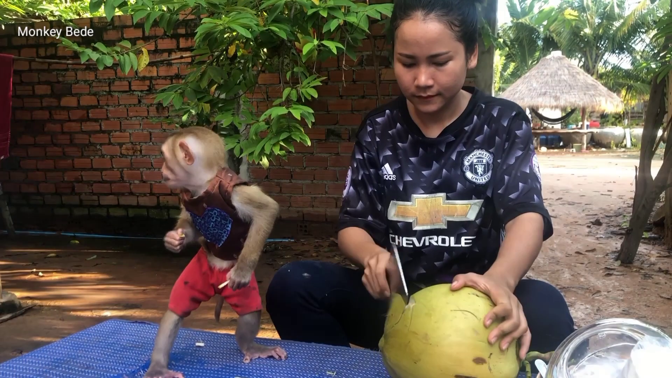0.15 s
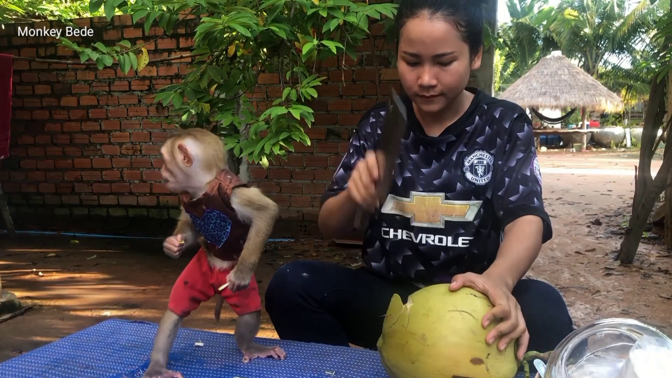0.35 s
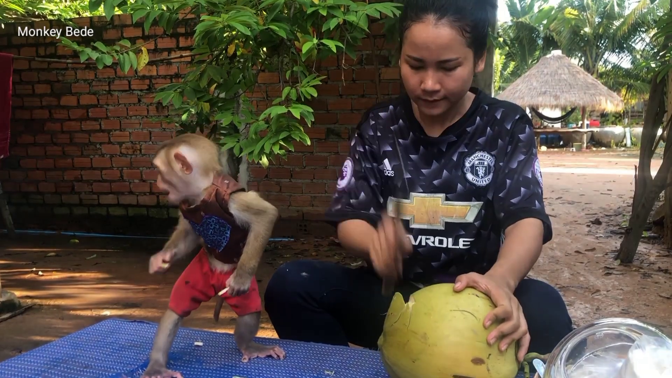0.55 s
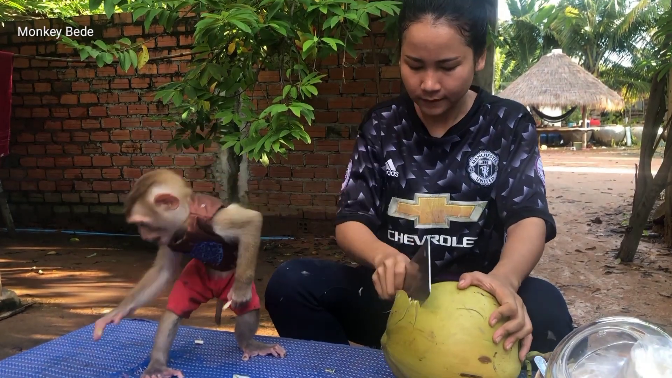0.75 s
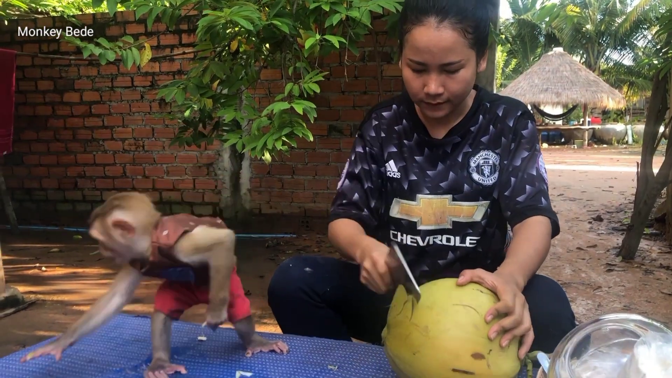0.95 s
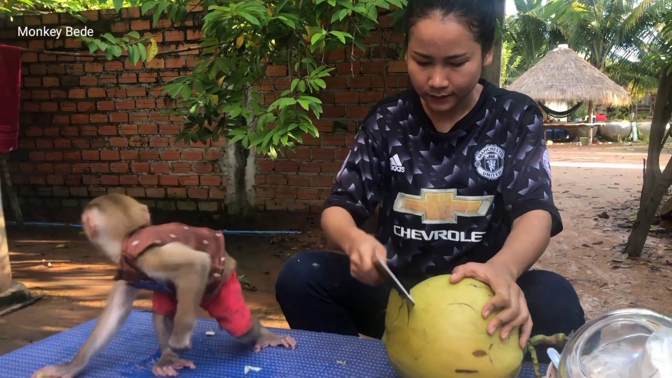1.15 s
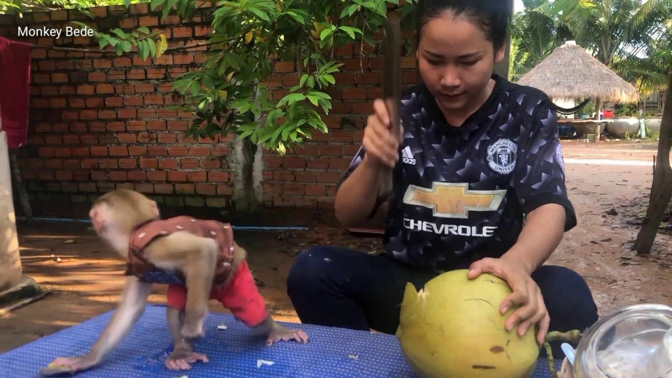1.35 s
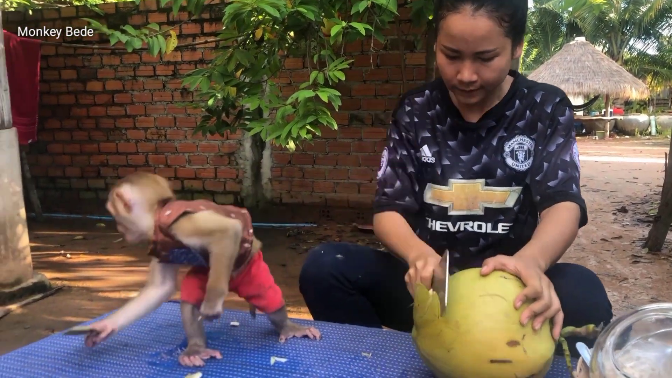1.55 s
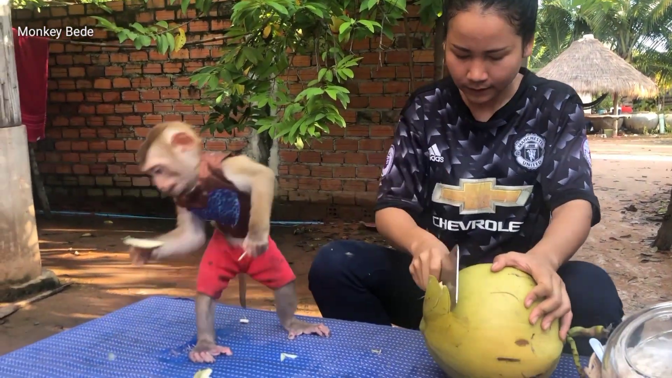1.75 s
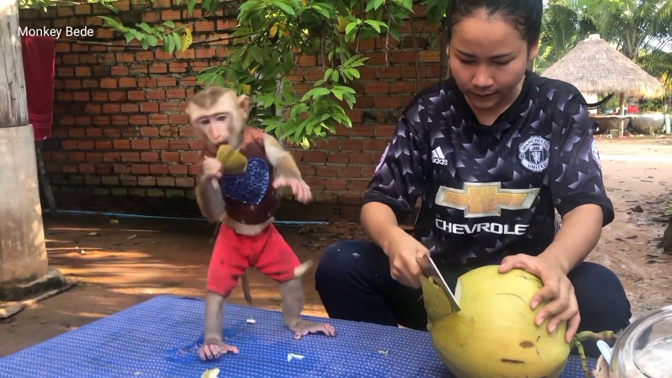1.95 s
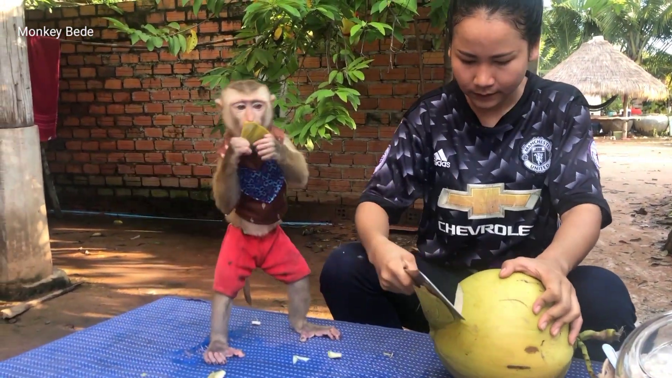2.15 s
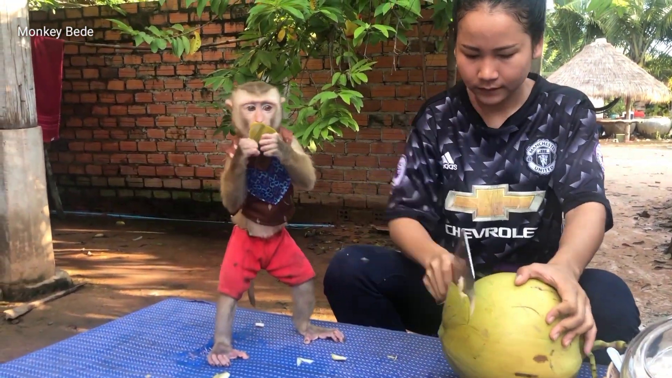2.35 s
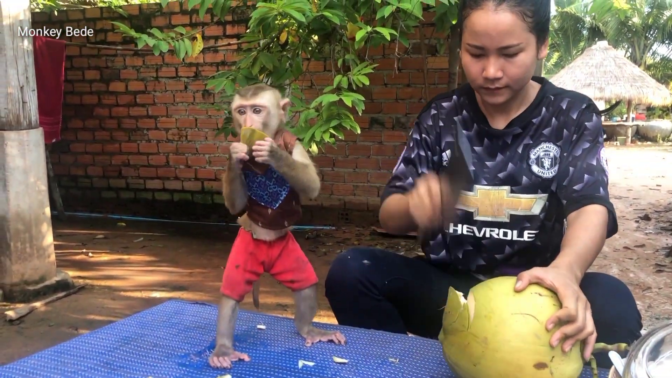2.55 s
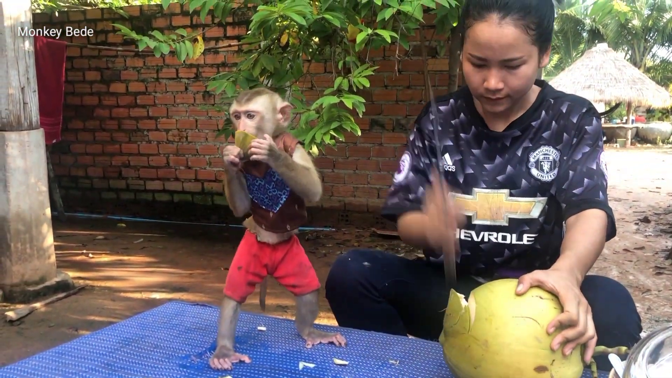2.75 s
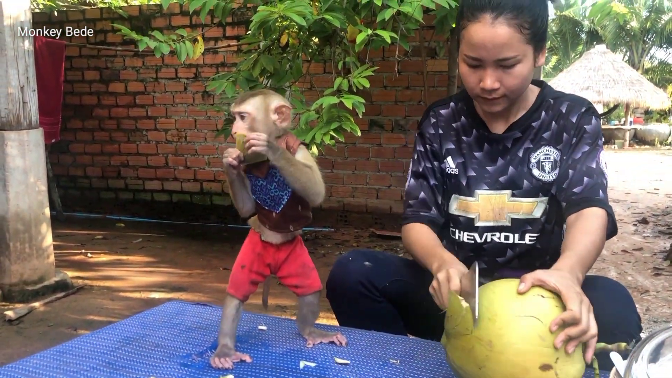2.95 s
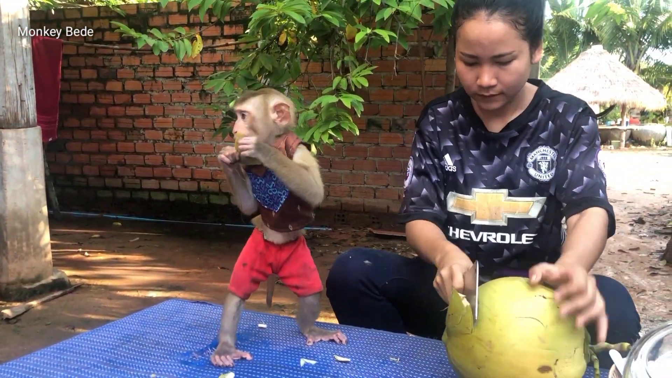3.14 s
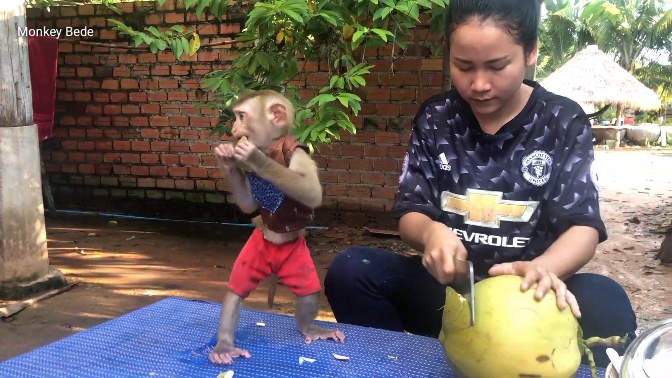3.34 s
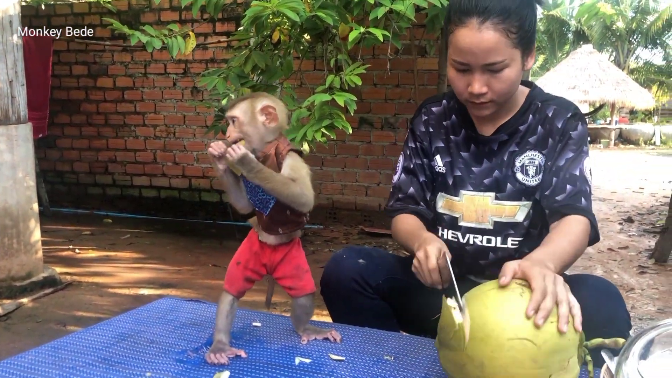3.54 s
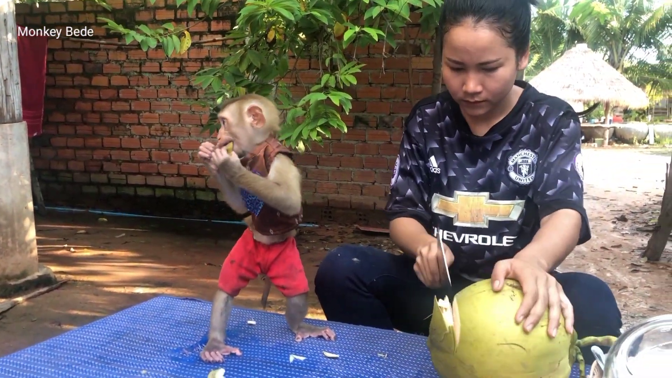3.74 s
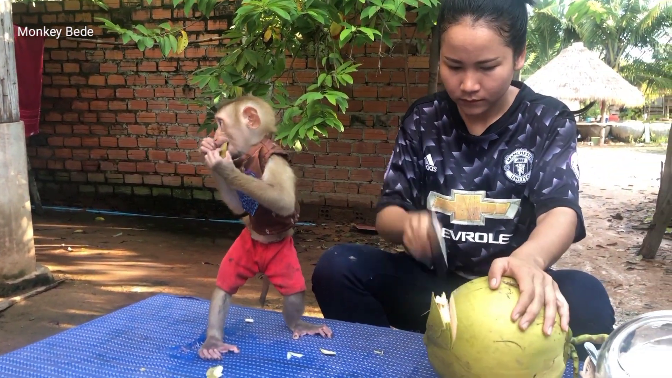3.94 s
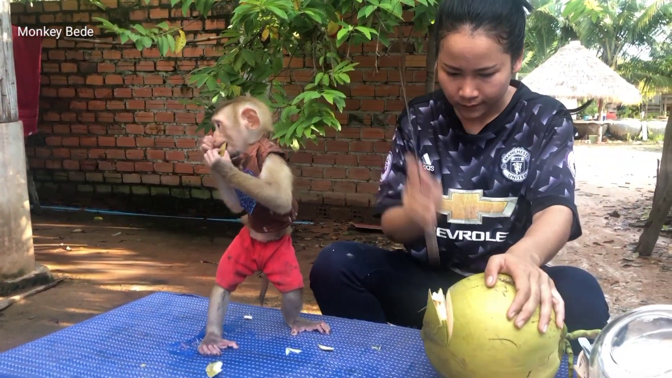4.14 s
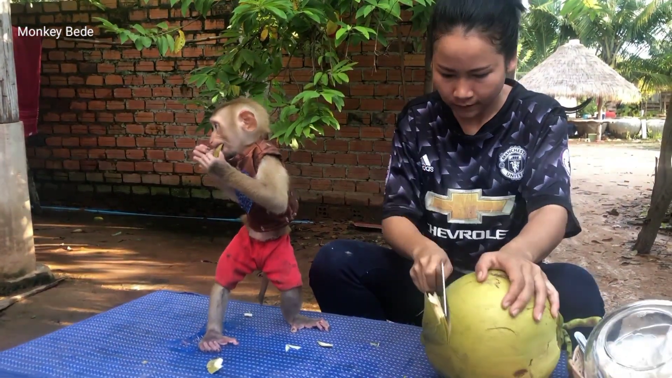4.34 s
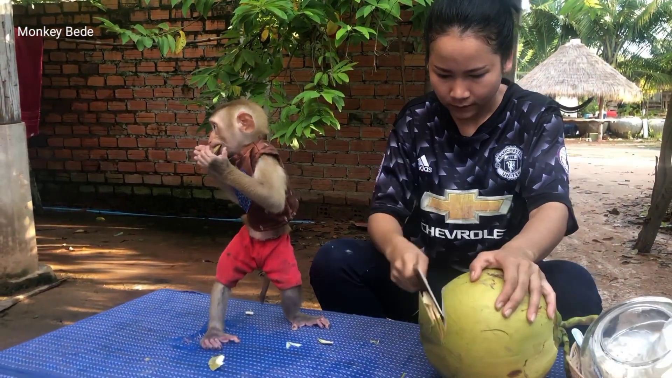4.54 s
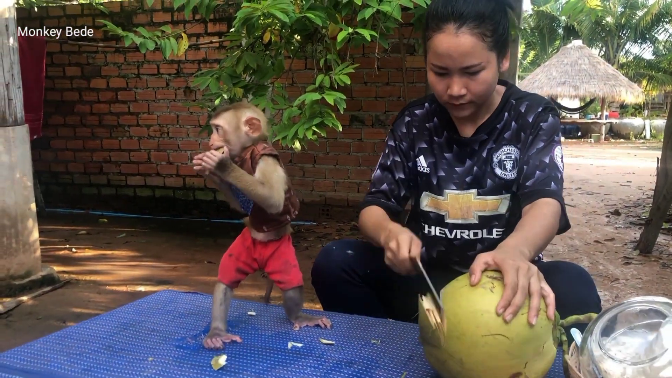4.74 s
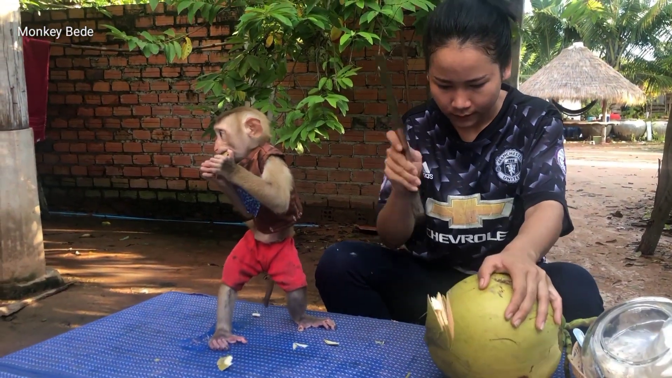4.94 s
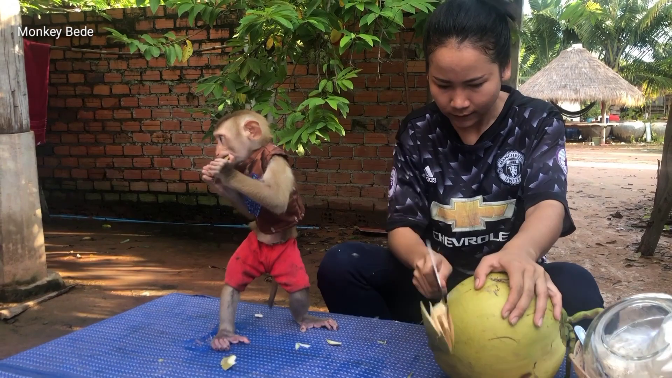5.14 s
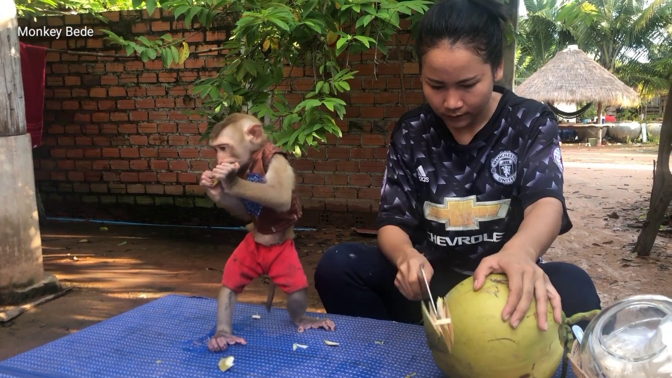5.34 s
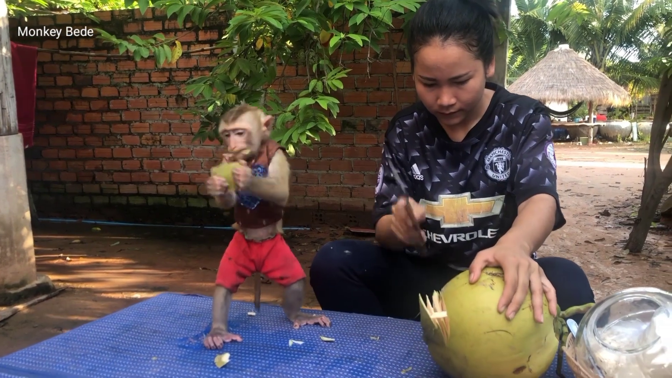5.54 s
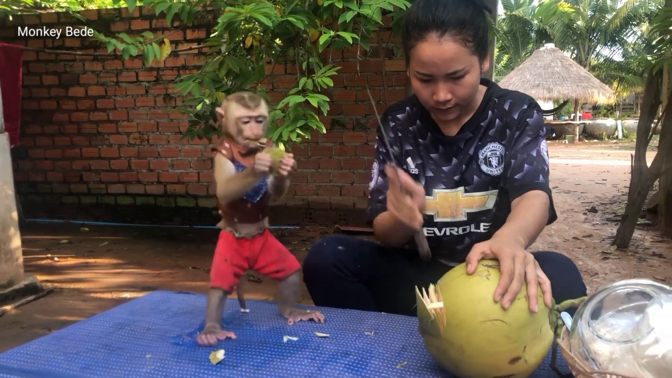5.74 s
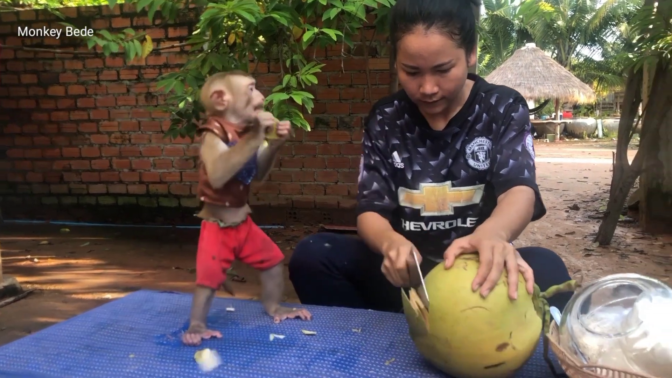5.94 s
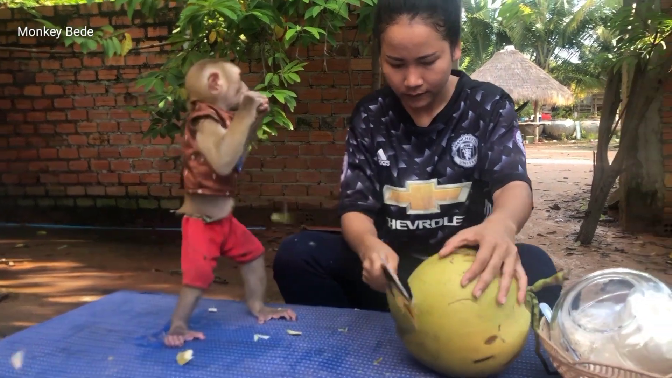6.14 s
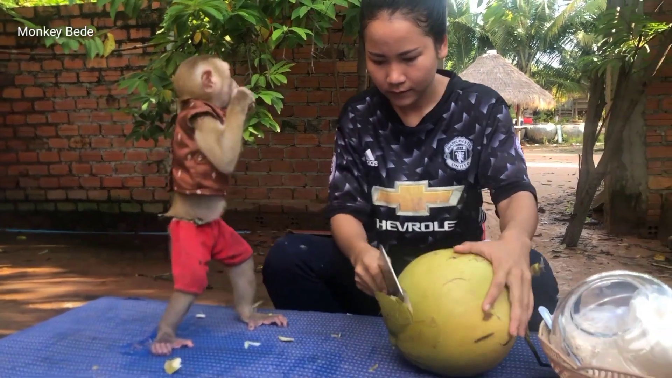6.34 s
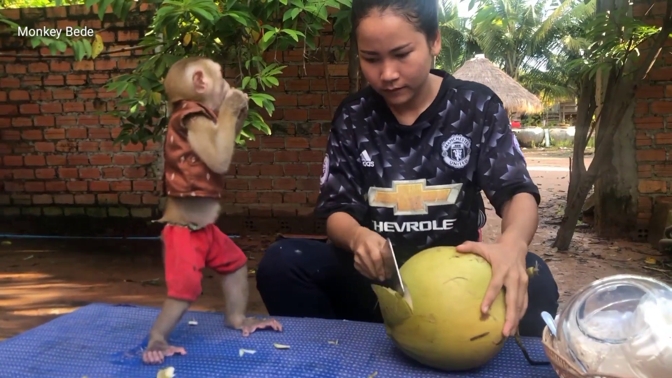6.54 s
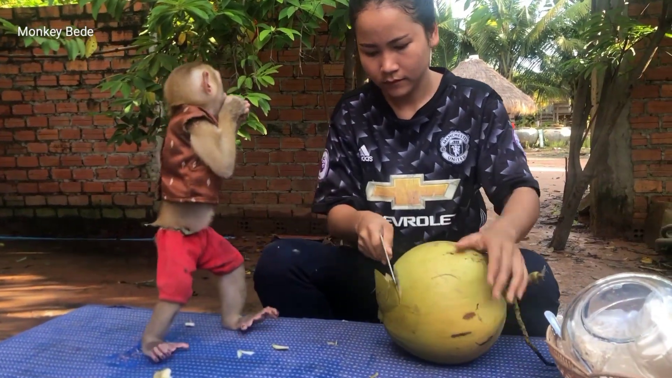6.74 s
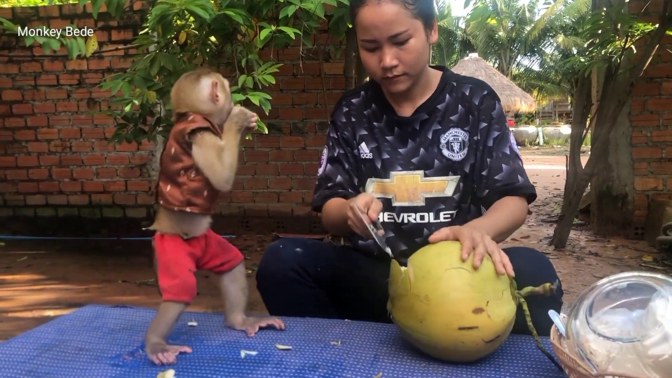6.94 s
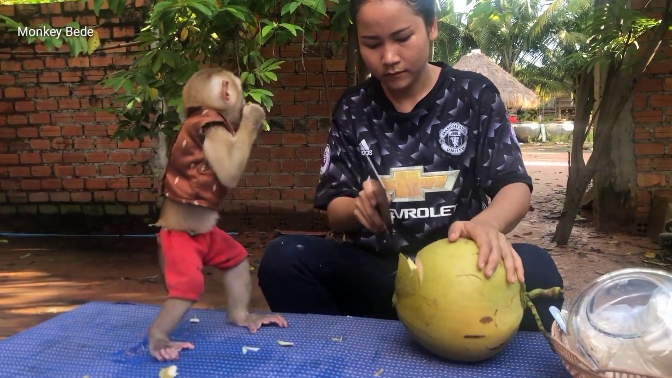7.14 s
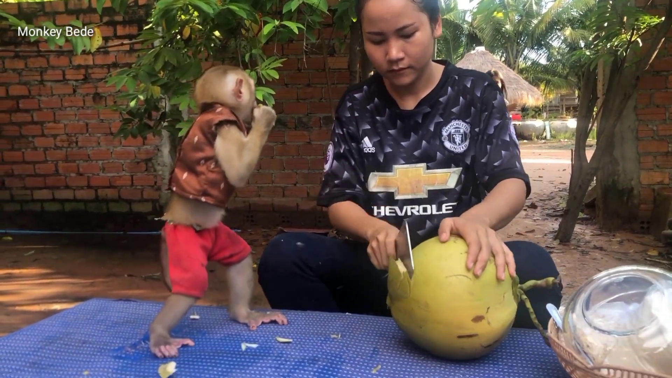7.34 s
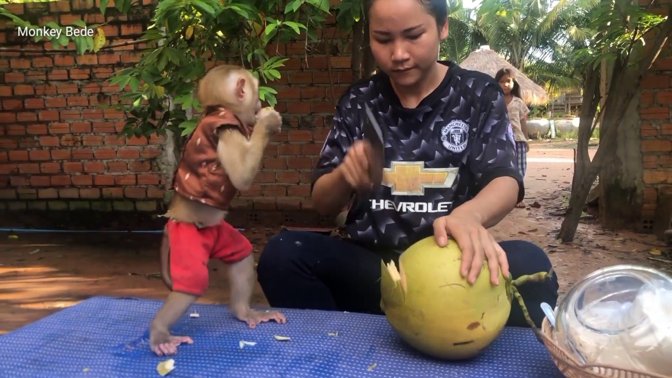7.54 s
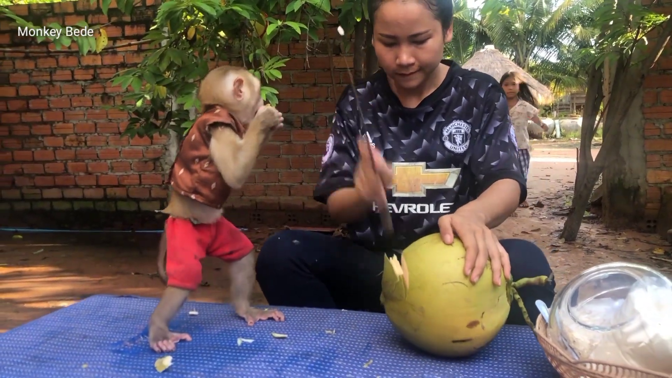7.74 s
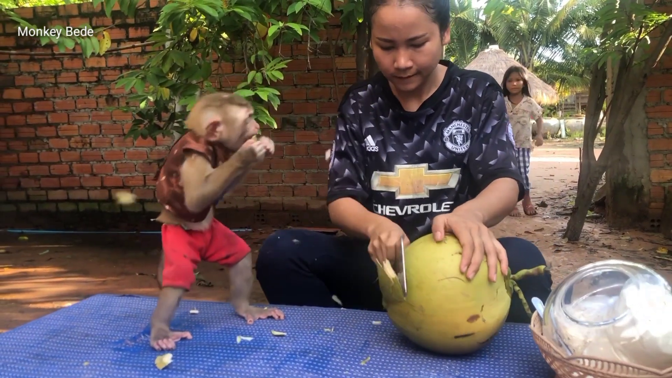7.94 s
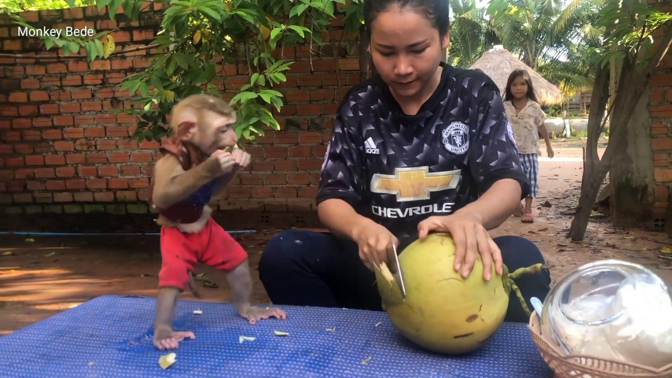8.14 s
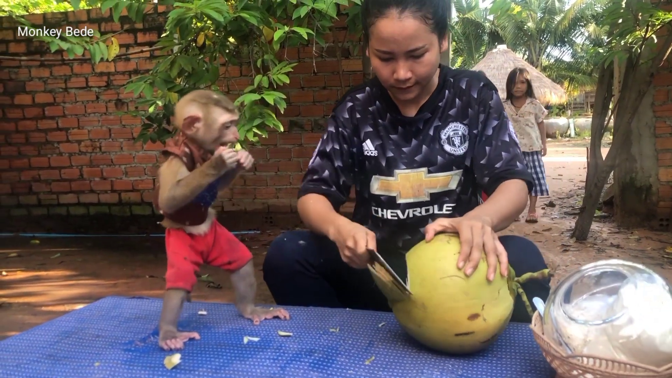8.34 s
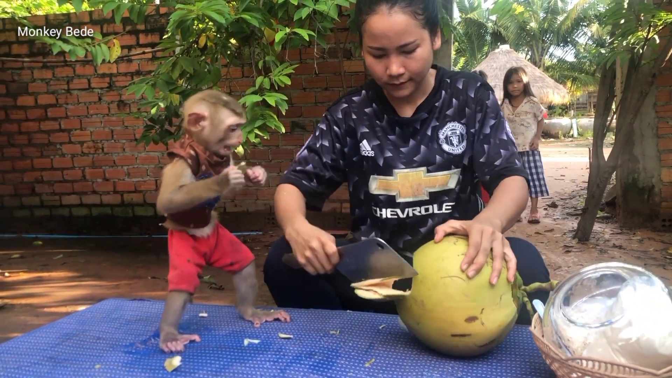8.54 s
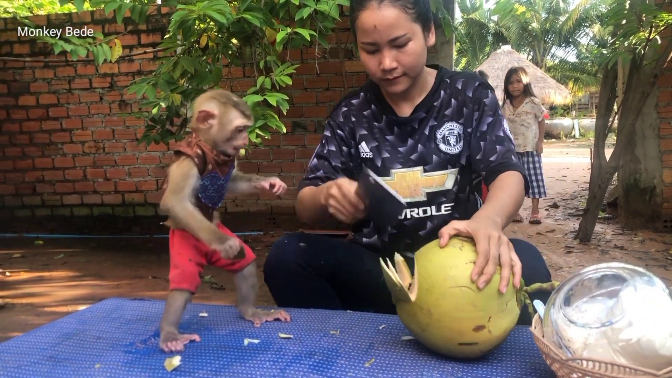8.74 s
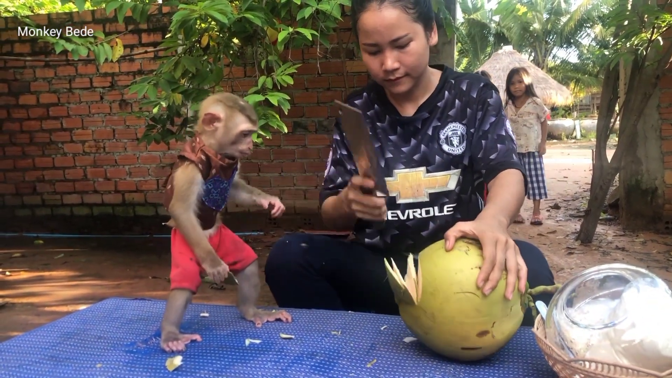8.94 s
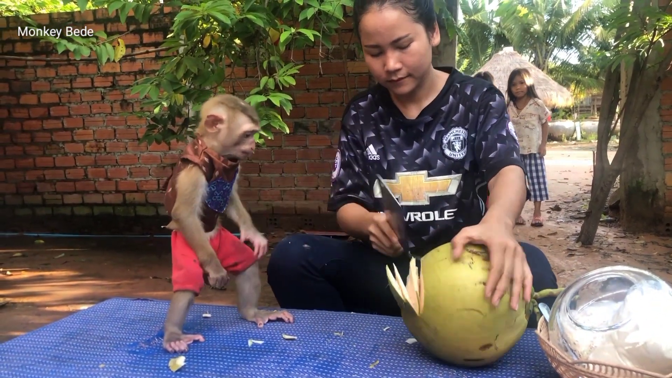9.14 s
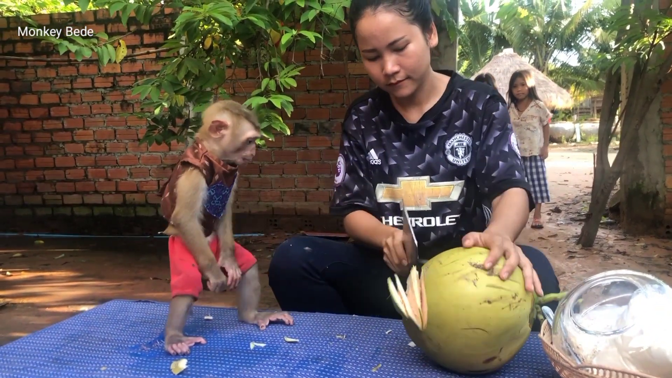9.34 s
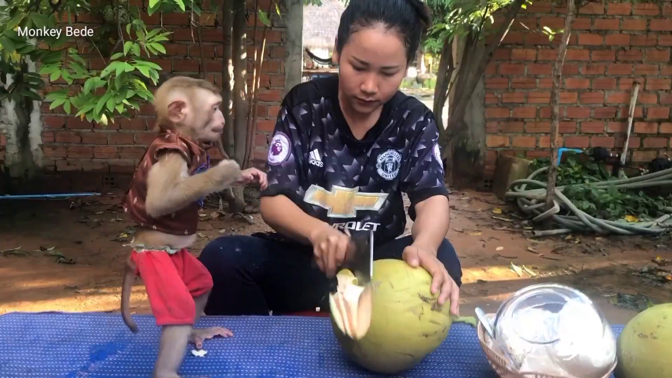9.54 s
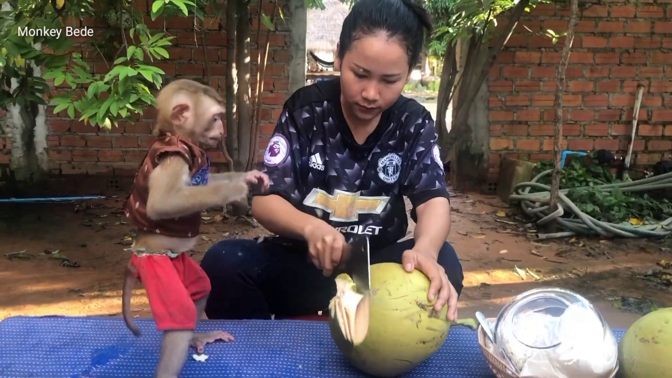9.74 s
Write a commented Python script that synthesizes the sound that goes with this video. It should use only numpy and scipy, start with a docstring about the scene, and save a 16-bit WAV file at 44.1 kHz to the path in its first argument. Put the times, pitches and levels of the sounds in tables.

```python
"""In a brick-walled yard, a cleaver chops into a green coconut on a mat. Shaped noise makes the husk crackle,
damped modes sound the shell and a falling sine makes the thump; the nut then lands in shrinking hops.
After most blows a steel dish chinks. Between blows the blade taps, pries, scrapes and squeaks: knocks,
ragged noise and gliding overtones. Far-off birds are swept sines; rumble and patchy hiss are uneven noise.
The sound drops out briefly just before the last chop."""
import sys
import numpy as np
from scipy import signal
from scipy.fft import rfft, irfft, next_fast_len
from scipy.io import wavfile
from scipy.ndimage import uniform_filter1d, map_coordinates

SR = 44100
rng = np.random.default_rng(int(sys.argv[2]) if len(sys.argv) > 2 else 0)


def file_out(sig):
    """Save sig as 16-bit WAV at sys.argv[1]."""
    # one column per channel
    cols = np.atleast_2d(sig).T
    # limit, then scale
    lim = np.clip(cols, -1, 1)
    pcm = np.round(lim * 32767).astype(np.int16)
    wavfile.write(sys.argv[1], SR, pcm)


N = 435699  # samples

# Blade into husk: start_s, cutting_s, crackle_db, tilt_db_per_octave, husk_thock_db, shell_knock_db,
# thump_db, final_thump_hz, first_hop_s, landing_db
CHOPS = [(.690, .009, -16, -1.3, -12.5, -16, -13, 159, 0.083, -18.5),
         (1.653, .009, -16, 0, -19.5, -24, -12.5, 163, 0.092, -16.5),
         (2.9036, .012, -17.5, -0.7, -15, -23, -15.5, 186, 0.083, -20),
         (4.288, 0.0053, -11.5, 1, -29, -5.5, -24.5, 194, 0.078, -31.5),
         (5.164, 0.0056, -14.5, -0.5, -26, -8.5, -19, 172, 0.084, -23),
         (5.893, .012, -25, 0.4, -31, -21.5, -17.5, 210, .085, -23.5),
         (7.903, 0.015, -22.5, -2, -17, -45, -13, 164.5, 0.083, -21),
         (9.617, 0.0091, -31, -.5, -51.5, -45, -19, 230, .089, -17.5)]
# Modes of the nut's hollow shell: nominal_hz, mean_level_db, t60_s
SHELL_MODES = [(484, -5.5, 0.038), (781, 3, 0.024), (1070, -3.5, .03), (1450, -11.5, 0.032),
               (1706, -13, 0.038), (2242, -19, 0.039), (2640, -17, 0.031), (3970, -17.5, 0.014)]
# Relative spectrum of tearing husk: frequency_hz, level_db_per_hz
HUSK_SPECTRUM = [(60, -35), (200, -1), (500, 3.5), (650, -3), (1100, 1), (1900, 0), (3300, -2), (5000, -6),
                 (8500, -9.5), (10200, -9.5), (12000, -9.5), (14000, -5), (15500, -9)]
# Relative spectrum of sliding hiss: frequency_hz, level_db_per_hz
HISS_SPECTRUM = [(300, -33), (1500, 4.5), (4000, 8.5), (7000, 3), (11000, 0), (14500, 9.5), (16000, 2)]
# Relative spectrum of the nut's body when rubbed or tapped: frequency_hz, level_db_per_hz
RUB_SPECTRUM = [(60, -12.5), (180, 2), (450, 4), (800, -2.5), (1400, -2.5), (2200, -15), (3500, -24),
                (8000, -41)]


def amp(db):
    """Logarithmic level: decibels become amplitude gain."""
    return 10 ** (np.asarray(db) / 20)


def unit(x):
    """Power normalization: scale to rms 1."""
    return x / np.sqrt(np.mean(x ** 2) + 1e-20)


def along(points, hz):
    """Logarithmic frequency scale: interpolate (Hz, value) points along it."""
    point_hz, value = np.transpose(points)
    return np.interp(np.log(hz + 1), np.log(point_hz), value)


def clock(seconds):
    """Uniform sampling: sample times from zero."""
    return np.arange(int(seconds * SR)) / SR


def add(track, start_s, x):
    """Superposition: mix x into the track from its start time."""
    i = max(round(start_s * SR), 0)
    track[i:i + len(x)] += x[:max(len(track) - i, 0)]


def wobble(t, rate):
    """Band-limited fluctuation: a smooth random curve with rate knots a second."""
    knots = rng.standard_normal(int(t[-1] * rate) + 4)
    return map_coordinates(knots, [t * rate])


def filtered(x, response):
    """Linear filtering: multiply the spectrum by a response of frequency."""
    size = next_fast_len(len(x) + 4096)  # zero padding limits wrap-around
    hz = np.fft.rfftfreq(size, 1 / SR)
    return irfft(rfft(x, size) * response(hz), size)[:len(x)]


def grit(t, spectrum, ragged_db, rate):
    """Amplitude-modulated noise: random level swings bunch it, a spectrum colours it; rms 1."""
    clumps = rng.standard_normal(len(t)) * amp(ragged_db * wobble(t, rate))
    return unit(filtered(clumps, lambda hz: amp(along(spectrum, hz))))


def ring(modes, attack, scatter_db):
    """Modal superposition: damped sines, at slightly new strengths and pitches each time."""
    t = clock(.3)
    hz, db, t60 = np.transpose(modes)[:, :, None]
    level, detune = rng.standard_normal((2, len(modes), 1))
    decay = amp(db + scatter_db * level - 60 * t / t60)
    waves = decay * np.sin(2 * np.pi * hz * (1 + 0.0067 * detune) * t)
    return waves.sum(0) * (1 - np.exp(-t / attack))


def chops():
    """Fracture noise and impulse response: torn fibres crackle; the push excites husk and shell modes."""
    out, t = np.zeros(N), clock(.3)
    for start_s, cutting_s, crackle_db, tilt, thock_db, knock_db, *_ in CHOPS:
        travel = t / cutting_s
        # the skin parts at once, the tearing swells with depth and ends as the blade sticks
        cut = np.minimum(0.29 + travel / 0.71, 1) / np.sqrt(1 + (travel / 0.88) ** 14)
        # each chop's crackle has its own brightness
        colour = [(hz, db + tilt * np.log2(hz)) for hz, db in HUSK_SPECTRUM]
        blow = amp(crackle_db) * cut * grit(t, colour, ragged_db=0.4, rate=1800)
        thock = ring([(430, 0.0027, .032)], attack=0.0016, scatter_db=1.0)  # one husk mode
        knock = ring(SHELL_MODES, attack=0.0015, scatter_db=0.8)
        add(blow, .25 * cutting_s, amp(thock_db) * thock)
        add(blow, .25 * cutting_s, amp(knock_db) * knock)
        add(out, start_s, in_yard(blow, wet_db=-13))
    return out


def thuds(count=3):
    """Inelastic rebound: the driven nut lands in ever shorter, weaker hops; tipped by hand, it rocks."""
    # The nut rocks on the mat: thump_s, thump_db, final_pitch_hz
    rocks = [(.301, -32.5, 243), (.344, -35.5, 232), (2.171, -27, 158), (6.598, -34, 218),
             (6.824, -40, 212), (7.267, -44, 192)]
    # the mat's crunch: level over the thump, and time scale of its lead
    push_crunch_db, push_lead_s = -7.5, 0.0078
    land_crunch_db, land_lead_s = -7.5, 0.017
    rock_crunch_db, rock_lead_s = -12.5, 0.0092
    land_hz, settle_hz = 144.4, 167.4  # first landing, later bounces
    hop_shrink = .62  # each flight over the one before
    hop_loss_db = 15  # times the square root of the bounce number
    out = np.zeros(N)
    for start_s, cutting_s, *_, thump_db, hz, hop_s, landing_db in CHOPS:
        sinking_s = .030 + .55 * cutting_s  # from the blow until the nut bottoms out
        add(out, start_s, thud(thump_db, hz, push_crunch_db, push_lead_s, sinking_s))
        takeoff_s = start_s + sinking_s
        for k in range(count):
            flight_s = hop_s * hop_shrink ** k
            pitch = settle_hz if k else land_hz
            level_db = landing_db - hop_loss_db * np.sqrt(k)
            add(out, takeoff_s, thud(level_db, pitch, land_crunch_db, land_lead_s, flight_s))
            takeoff_s += flight_s
    tipping_s = .04
    for thump_s, thump_db, hz in rocks:
        add(out, thump_s - tipping_s, thud(thump_db, hz, rock_crunch_db, rock_lead_s, tipping_s))
    return out


def thud(thump_db, hz, crunch_db, lead_s, early_s):
    """Compression and release: the mat crunches, then the nut thumps early_s in, its pitch sinking."""
    # Relative spectrum of the crunching mat: frequency_hz, level_db_per_hz
    crunch_spectrum = [(40, -22), (150, 4.5), (480, -1.5), (650, -6), (950, -5.5), (2000, -14.5),
                       (3500, -20), (6000, -29), (10000, -35.5), (15000, -32.5)]
    # Modes of the mat and the ground under it: nominal_hz, mean_level_db, t60_s
    ground_modes = [(68.4, -13, 0.11), (150.8, -15.5, 0.11)]
    t = clock(.3)
    ahead = (early_s - t) / lead_s
    # a faint creak leads in, then the fibres give way all at once
    squeeze = 0.42 * np.exp(-np.abs(ahead) / 2) + 0.62 / np.sqrt(1 + (ahead / 0.95) ** 10)
    release = np.exp(-np.maximum(t - early_s, 0) / 0.0051)
    crunch = grit(t, crunch_spectrum, ragged_db=2.5, rate=500)
    blow = amp(crunch_db) * squeeze * release * crunch
    pitch = hz * (1 + 1.554 * np.exp(-t / 0.0033))  # sinks to hz as the load eases
    envelope = amp(-60 * t / 0.075) * (1 - np.exp(-t / 0.00077))
    nut = -np.sin(2 * np.pi * np.cumsum(pitch) / SR) * envelope
    add(blow, early_s, nut + ring(ground_modes, attack=0.0017, scatter_db=0.5))
    return in_yard(amp(thump_db) * blow, wet_db=-10.0)


def chinks():
    """Contact damping: the jolted dish drops back, its rim buzzing on the mat and soon falling silent."""
    # The dish lands: start_s, level_db (before a 3.5 dB cut)
    landings = [(.768, -35.5), (1.736, -34.5), (2.9944, -33.5), (5.251, -42.5), (7.987, -51), (9.741, -41)]
    # Modes of the dish: nominal_hz, mean_level_db, t60_s
    dish_modes = [(3340, -13, .1), (4120, -1, .09), (5500, -11, .05), (7620, -5, .06), (9080, -10, .07),
                  (9750, -6, .05), (10600, -10, .05), (13600, -9, .06), (14650, -3, .06)]
    out, t = np.zeros(N), clock(.3)
    for start_s, db in landings:
        rim = ring(dish_modes, attack=0.00046, scatter_db=5.5) * amp(3.6 * wobble(t, 440))
        buzz = amp(-2 - 60 * t / 0.12) * grit(t, HISS_SPECTRUM, ragged_db=2.0, rate=700)
        add(out, start_s, in_yard(amp(db - 3.5) * (rim + buzz), wet_db=-11.5))
    return out


def crumbs(count=7):
    """Random small impacts: chips jolted off the mat patter back 0.12 to 0.24 s after each chop starts."""
    out, t = np.zeros(N), clock(.03)
    for start_s, *_ in CHOPS:
        for when, size in rng.random((count, 2)):
            delay_s = .12 + .12 * when
            tick = amp(-60 * t / 0.013) * grit(t, HISS_SPECTRUM, ragged_db=1, rate=610)
            pat = amp(-60 * t / 0.058) * grit(t, RUB_SPECTRUM, ragged_db=6.0, rate=440)
            level_db = -33.0 - 31 * size - 10 * when  # a larger draw is quieter, and so is a later chip
            add(out, start_s + delay_s, amp(level_db) * (0.16 * tick + pat))
    return out


def taps():
    """Impact excitation: the blade set on the nut gives a click, a damped woody knock and a little steel."""
    # Light touches: start_s, click_db, shell_knock_db (before a 2.5 dB cut), steel_ring_db
    touches = [(.273, -33, -27, -57), (2.169, -51, -30.5, -70), (3.429, -45.5, -39.5, -73),
               (3.8911, -32.5, -36, -53), (3.902, -33, -33, -69), (4.058, -53, -39.5, -80),
               (4.652, -38, -38, -69), (6.263, -54, -37.5, -73), (6.324, -38.5, -23.5, -69),
               (6.359, -62, -31.5, -77), (6.453, -65, -38, -73), (7.367, -35.5, -43, -59),
               (9.363, -54, -37.5, -80.5), (9.418, -55, -25, -54)]
    # Modes of the blade: nominal_hz, mean_level_db, t60_s
    blade_modes = [(1744, -9, .2), (2713, -13, .2), (3946, -6, .1), (5308, -6, .2), (6756, -2, .18),
                   (8300, -9, .09), (9390, -13, .1), (13410, -13, .1)]
    out, t = np.zeros(N), clock(.3)
    for start_s, click_db, knock_db, steel_db in touches:
        click = amp(click_db - 60 * t / 0.026) * grit(t, HUSK_SPECTRUM, ragged_db=4.0, rate=1500)
        husk = amp(-3 - 60 * t / 0.05) * grit(t, RUB_SPECTRUM, ragged_db=0.5, rate=180)
        shell = ring(SHELL_MODES, attack=0.0018, scatter_db=1.0)
        knock = amp(knock_db - 2.5) * (shell + husk)
        steel = amp(steel_db) * ring(blade_modes, attack=0.0008, scatter_db=2.8)
        add(out, start_s, in_yard(click + knock + steel, wet_db=-12.0))
    return out


def prying():
    """Friction and fracture noise: steel or skin drags in ragged strokes; fibres snap singly or in bursts."""
    # Blade or palm slides on the husk: start_s, length_s, hiss_db, rubbing_body_db
    strokes = [(1.106, 0.062, -56.5, -75), (1.284, 0.028, -60.5, -57), (2.377, 0.044, -53.5, -56),
               (3.336, .33, -64.5, -60.5), (4.821, 0.052, -57.5, -55.5), (5.592, 0.029, -51.5, -57.5),
               (6.049, 0.45, -64.5, -57), (6.481, 0.32, -55, -55), (6.811, 0.065, -65, -50),
               (7.031, 0.21, -77, -57.5), (7.367, .05, -51, -50), (7.615, 0.042, -49.5, -61),
               (7.756, .14, -51, -73), (8.146, 0.093, -61.5, -74), (8.282, 0.17, -52, -58),
               (8.491, .27, -63, -58), (8.58, 0.071, -47, -53.5), (9.62, 0.064, -49, -61),
               (9.751, 0.2, -59.5, -54)]
    # Single fibres snap: start_s, level_db
    single_snaps = [(2.158, -34.5), (4.707, -39.5), (7.312, -41.5), (8.138, -39.5), (8.255, -48),
                    (8.312, -39), (8.509, -44)]
    # The blade levers a slice and fibres snap in quick bursts: start_s, length_s, mean_level_db
    levers = [(1.988, .11, -44.5), (2.135, .04, -38.5), (8.41, .18, -44.5)]
    fibres_per_s, fibre_spread_db = 64, 3
    out = np.zeros(N)
    for start_s, length_s, hiss_db, body_db in strokes:
        t = clock(length_s)
        # exponent 0 would start and stop abruptly, 1 gives a full arch
        speed = np.abs(np.sin(np.pi * t / length_s)) ** 0.56
        # quiet slides are more ragged: 2 dB at -53 dB of hiss, falling by e over 24 dB
        ragged_db = 2 * np.exp((-53 - hiss_db) / 24)
        hiss = amp(hiss_db) * grit(t, HISS_SPECTRUM, ragged_db, rate=450)
        body = amp(body_db) * grit(t, RUB_SPECTRUM, ragged_db=6.5, rate=77.7)
        add(out, start_s, in_yard(speed * (hiss + body), wet_db=-10.5))
    snaps, t = list(single_snaps), clock(.05)
    for start_s, length_s, db in levers:
        for slot_s in np.arange(start_s, start_s + length_s, 1 / fibres_per_s):
            snap_s = slot_s + rng.random() / fibres_per_s / 2
            snaps.append((snap_s, db + fibre_spread_db * rng.standard_normal()))
    for snap_s, db in snaps:
        snap = amp(db - 60 * t / 0.016) * grit(t, HISS_SPECTRUM, ragged_db=0.5, rate=1500)
        add(out, snap_s, in_yard(snap, wet_db=-9.5))
    return out


def squeaks(count=4):
    """Stick-slip oscillation: steel on wet fibre gives a short unsteady stack of overtones."""
    # The blade squeaks in the husk: start_s, length_s, start_slip_hz, end_slip_hz, level_db
    slips = [(1.03, 0.039, 1142, 1493, -56), (1.055, 0.03, 800, 960, -54.5),
             (8.32, .022, 2060, 1710, -51.5), (8.686, 0.03, 2410, 2710, -58)]
    out = np.zeros(N)
    k = np.arange(1, count + 1)[:, None]
    for start_s, length_s, start_hz, end_hz, db in slips:
        t = clock(length_s)
        glide = start_hz + (end_hz - start_hz) * t / length_s
        rate = glide * (1 + 0.032 * wobble(t, 510))
        # the husk passes mostly the overtones near its squeak resonance at 2900 Hz
        weight = 1 / (1 + np.log2(k * rate / 2900) ** 2)
        stack = (weight * np.sin(2 * np.pi * k * np.cumsum(rate) / SR)).sum(0)
        swell = np.sin(np.pi * t / length_s)
        add(out, start_s, in_yard(amp(db) * swell * unit(stack), wet_db=-7))
    return out


def birds_and_held_note():
    """Frequency modulation: arched hoots, quick gliding whistles and one faint held note."""
    # All levels here are before a 4.5 dB cut
    # A far bird's soft hoots: start_s, length_s, top_hz, level_db
    hoots = [(.10, .14, 1235, -56.5), (.24, 0.138, 1186, -54), (0.437, 0.147, 1090, -55.5),
             (2.455, 0.11, 1120, -51), (2.60, 0.085, 1070, -59), (2.715, 0.092, 1064, -54),
             (3.372, .11, 1118, -55), (3.622, .11, 1070, -53.5), (3.793, 0.12, 1080, -55),
             (4.048, 0.089, 1083, -60), (4.21, 0.09, 1235, -51.5), (5.663, 0.089, 1110, -58)]
    # One faint held note, perhaps the blade ringing: start_s, length_s, pitch_hz, level_db
    held_notes = [(6.83, .38, 1730, -63)]
    # Small birds' whistles: start_s, length_s, start_hz, end_hz, level_db
    whistles = [(0, 0.027, 3700, 2460, -54.5), (.367, 0.05, 3850, 3470, -59), (1.57, .06, 5950, 6500, -66),
                (2.397, .11, 4200, 2840, -56.5), (3.451, 0.062, 4820, 2650, -53),
                (5.113, 0.045, 7230, 3600, -57.5), (7.313, .055, 5310, 3700, -48),
                (9.088, 0.052, 6100, 6500, -68.5)]
    out = np.zeros(N)
    for start_s, length_s, top_hz, db in hoots:
        # pitch falls with the squared distance from the top, 0.61 of the way through
        arch = 1 - .32 * (clock(length_s) / length_s - 0.61) ** 2
        add(out, start_s, note(top_hz * arch, db, waver=0.0089, flutter_db=7.5, wet_db=-7.5))
    for start_s, length_s, hz, db in held_notes:
        level_pitch = hz * np.ones_like(clock(length_s))
        add(out, start_s, note(level_pitch, db, waver=.008, flutter_db=2.5, wet_db=0))
    for start_s, length_s, start_hz, end_hz, db in whistles:
        glide = start_hz * (end_hz / start_hz) ** (clock(length_s) / length_s)
        add(out, start_s, note(glide, db, waver=.028, flutter_db=6.5, wet_db=0))
    return out


def note(pitch, db, waver, flutter_db, wet_db):
    """Phase integration: one note follows a wavering pitch curve while its level flutters."""
    t, progress = np.arange(len(pitch)) / SR, np.linspace(0, 1, len(pitch))
    wavering = pitch * (1 + waver * wobble(t, pitch[0] / 10))
    flutter = flutter_db * wobble(t, pitch[0] / 30)
    swell = np.sqrt(np.abs(np.sin(np.pi * progress)))
    tone = np.sin(2 * np.pi * np.cumsum(wavering) / SR)
    return in_yard(amp(db - 4.5 + flutter) * swell * tone, wet_db)


def outdoors():
    """Broadband turbulence: a restless low rumble under a patchy hiss of distant leaves."""
    # Relative spectrum of the yard air: frequency_hz, level_db_per_hz
    air_spectrum = [(15, -40.5), (25, -20.5), (58, -5), (148, -1), (313, -10), (389, -12), (684, -15.5),
                    (741, -16.5), (1050, -17), (1410, -22), (2300, -26.5), (2490, -28), (3170, -23.5),
                    (6210, -34), (15500, -40.5)]
    # The breeze: time_s, rumble_db (before a 3 dB lift), distant_hiss_db (before a 1.2 dB cut)
    breeze = [(0, -57, -60), (2.0, -57, -59), (5.8, -58.5, -58), (6.5, -55, -58), (7.3, -52.5, -56),
              (8.2, -63, -61), (8.701, -56.5, -59.5), (9.1, -64.5, -64.5), (9.499, -61, -65)]
    t = np.arange(N) / SR
    time_s, rumble_db, hiss_db = np.transpose(breeze)
    low = lambda hz: 1 / (1 + (hz / 500) ** 4)
    high = lambda hz: np.sqrt(1 - low(hz) ** 2)  # power complement of low
    rumble = unit(filtered(grit(t, air_spectrum, ragged_db=1, rate=12), low))
    hiss = unit(filtered(grit(t, air_spectrum, ragged_db=1.5, rate=9), high))
    rumble_gain = amp(np.interp(t, time_s, rumble_db) + 3)
    hiss_gain = amp(np.interp(t, time_s, hiss_db) - 1.2)
    return rumble_gain * rumble + hiss_gain * hiss


def in_yard(x, wet_db):
    """Diffuse reverberation: walls and ground answer with decaying noise; the bass lingers longest."""
    # Reverberation time of the yard: frequency_hz, t60_s
    walls = [(100, 0.66), (300, 0.37), (1000, 0.27), (4000, 0.29), (14000, 0.2)]
    hz, t, noise = signal.stft(rng.standard_normal(SR // 2), SR, nperseg=256)
    decay = amp(-60 * t / along(walls, hz)[:, None])
    tail = signal.istft(noise * decay, SR, nperseg=256)[1]
    tail *= 1 - np.exp(-(np.arange(len(tail)) / SR / 0.0029) ** 2)  # gradual onset
    response = amp(wet_db) * tail / np.linalg.norm(tail)
    response[0] += 1  # direct sound
    return signal.fftconvolve(x, response)


def scene():
    """Superposition of sources: everything in the yard, at one microphone."""
    blows = chops() + thuds() + chinks() + crumbs()
    handling = taps() + prying() + squeaks()
    return (blows + handling + birds_and_held_note() + outdoors())[None]


def record(dry):
    """Band limiting and gating: deep bass rolls off, the top is cut and the sound drops out briefly."""
    # The dropout: start_s, end_s
    silent = (9.535, 9.612)
    low_cut_hz, top_hz = 34, 15650
    t = np.arange(N) / SR
    bass_cut = signal.butter(2, low_cut_hz, "highpass", fs=SR, output="sos")
    heard = signal.sosfilt(bass_cut, dry[0])
    live = 1.0 * ((t < silent[0]) | (t > silent[1]))
    gate = uniform_filter1d(live, size=128)  # short fades at both edges
    return filtered(heard * gate, lambda hz: 1 / (1 + (hz / top_hz) ** 200))[None]


dry = scene()
out = record(dry)
file_out(out)
```